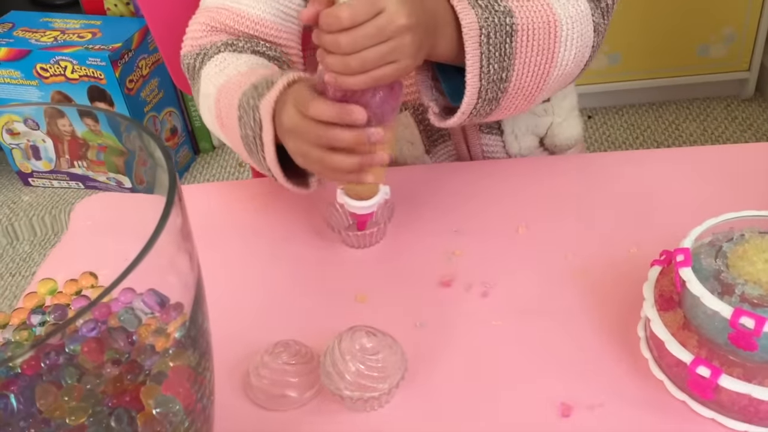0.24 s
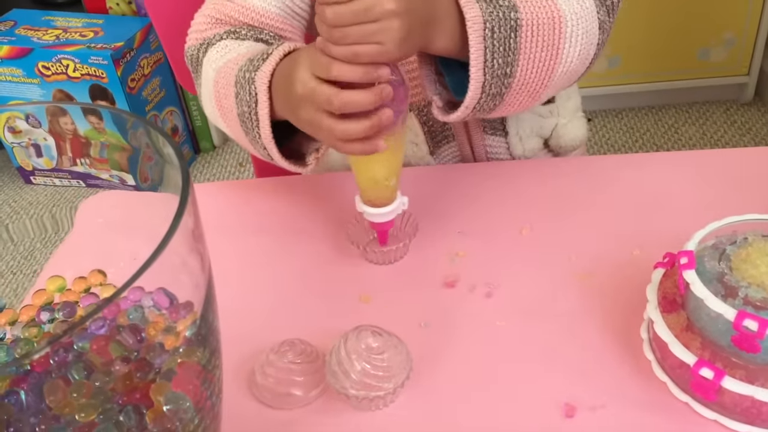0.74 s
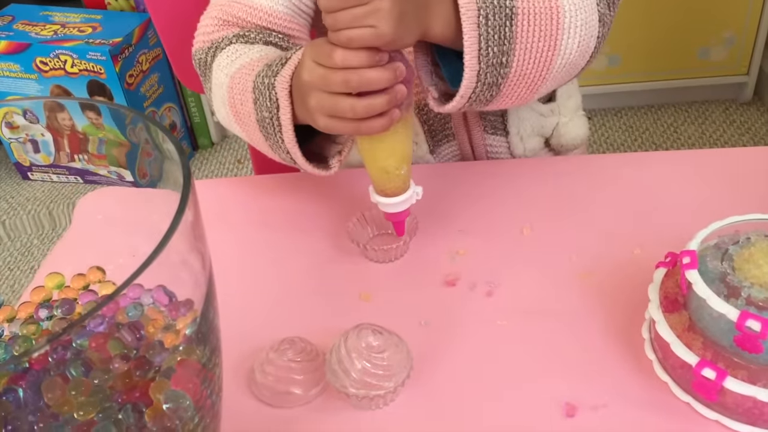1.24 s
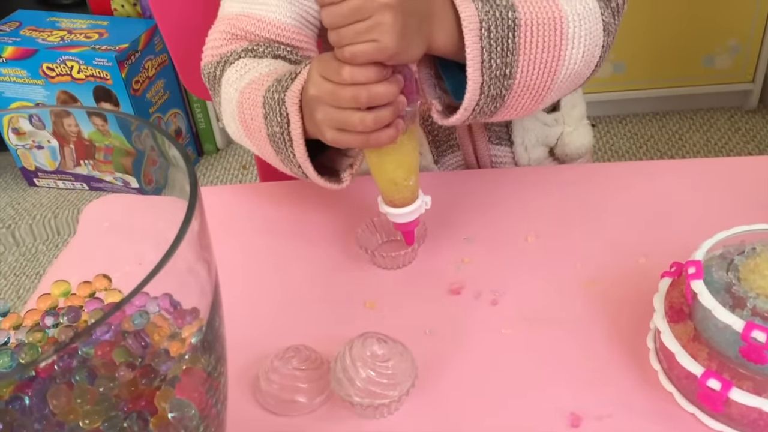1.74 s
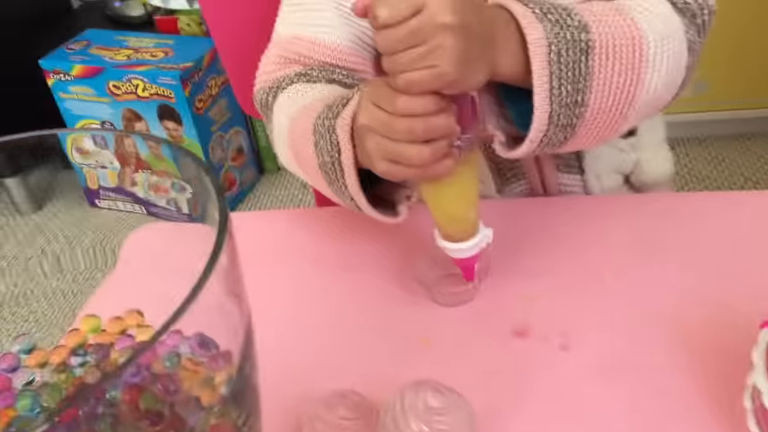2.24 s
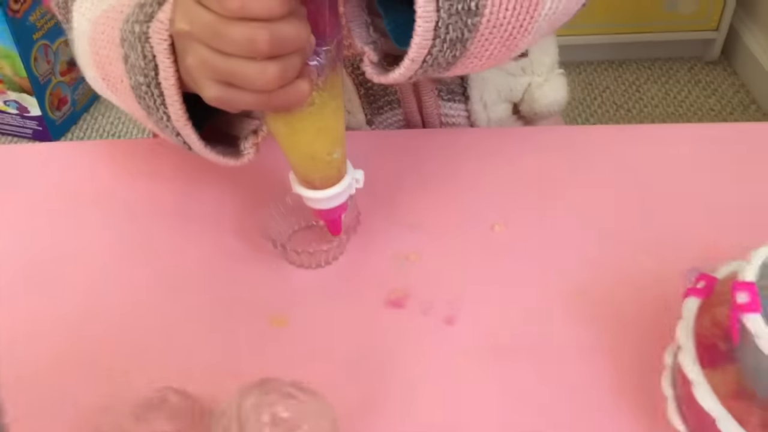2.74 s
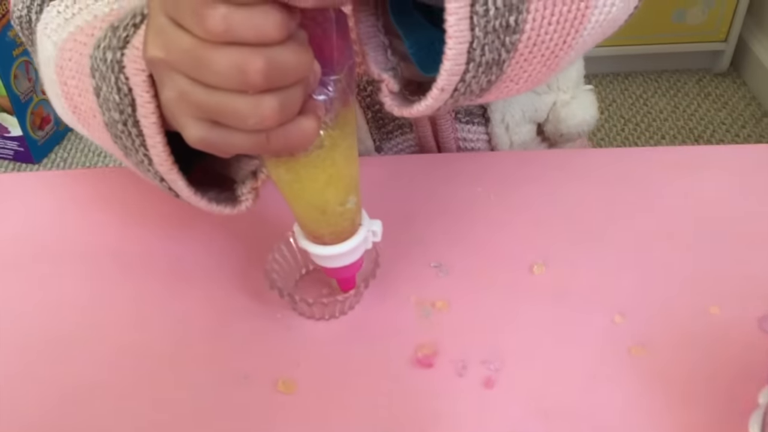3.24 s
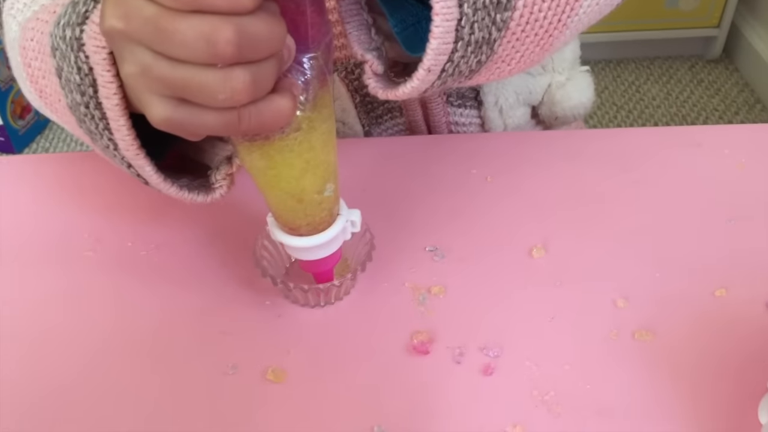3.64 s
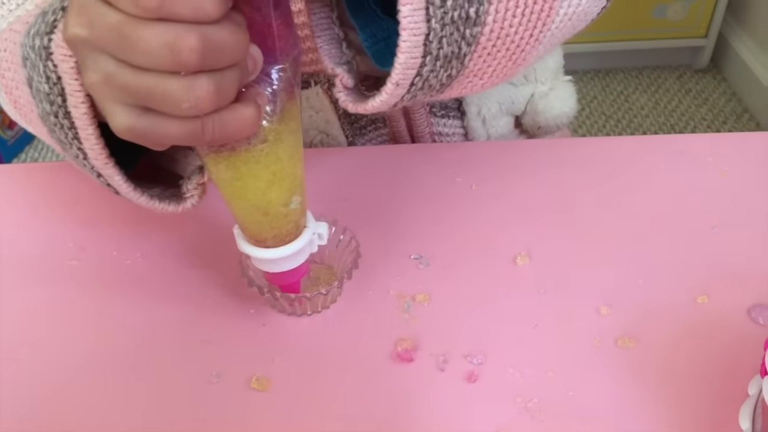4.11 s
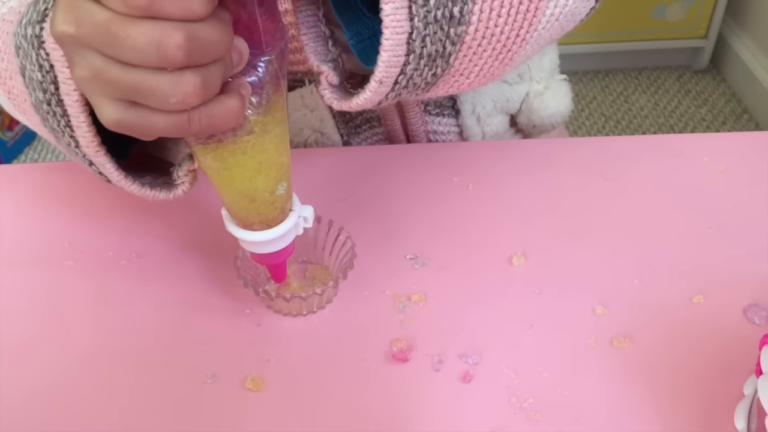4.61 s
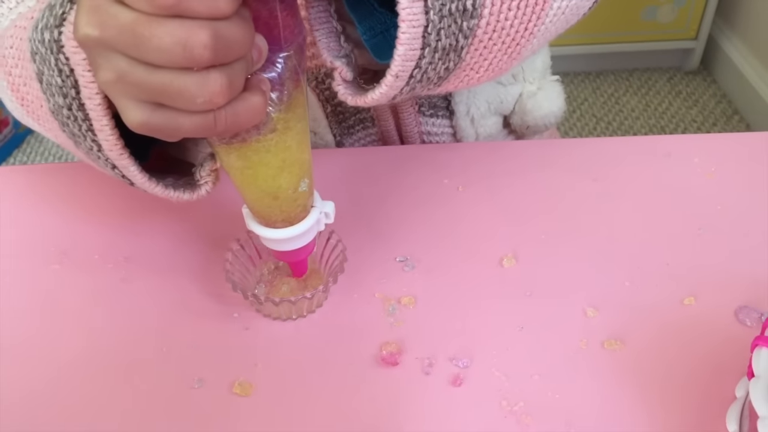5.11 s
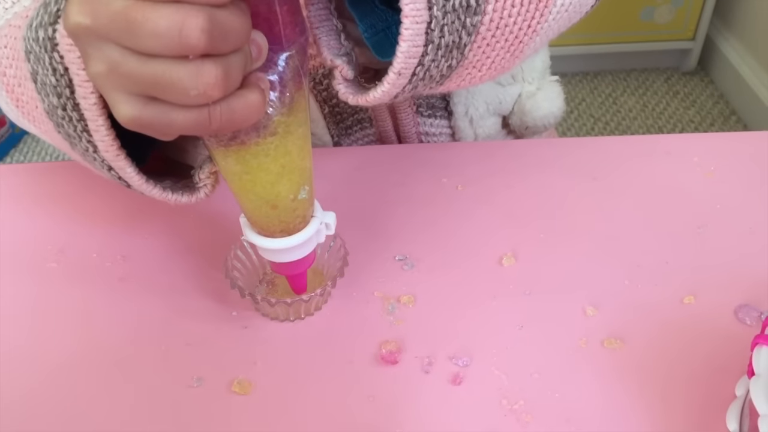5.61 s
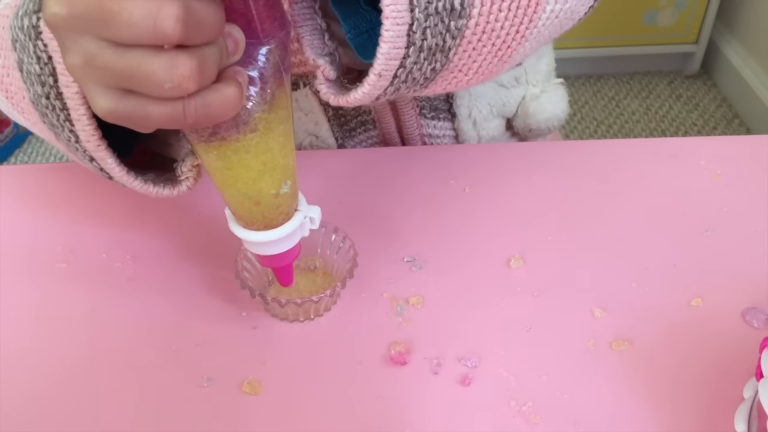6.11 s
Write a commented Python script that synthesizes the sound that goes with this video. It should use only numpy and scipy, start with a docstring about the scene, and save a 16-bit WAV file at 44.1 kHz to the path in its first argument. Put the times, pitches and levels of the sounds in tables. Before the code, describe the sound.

A quiet room with soft air noise and a low hum, heard close to a table through a camera microphone, with a short room tail. At about 0.3 s a faint wet squeeze crackles. From 0.4 to 0.7 s a nozzle makes short bright ticks on a thin plastic mould, with a firm, loud table knock and low thud at 0.5 s. At 0.75 s trapped air spits in a rapid flutter. A weak spurt and dull thud follow around 1.2 s, a single small pop at 1.8 s. From 2.0 to 2.7 s fingers rub and bump the camera, low and muffled, ending in a clearer bump. From 2.9 s beads squeeze through in tiny crisp wet pops and crackle, busiest and sharpest around 4.4 s. After 5.3 s the crackle becomes thicker, duller and more gurgling, continuing to the end at 6.3 s as the hum rises slightly.

```python
"""Close by a table in a quiet room: an icing bag of soft water beads is squeezed into a small plastic mould.
After a first faint squeeze the nozzle ticks on the mould, which knocks on the table: ringing modes and grit.
Trapped air spits out by ringing the nozzle's air; then fingers rub and bump the camera as it is moved closer.
Last the beads burst through the nozzle: pops of shaped noise with a cavity ring, over a crackle of noise grains.
Room air and a low hum, both coloured noise, run underneath, and the walls answer with a short tail."""
import sys
import numpy as np
from scipy import signal
from scipy.fft import rfft, irfft, next_fast_len
from scipy.io import wavfile

SR = 44100
rng = np.random.default_rng(int(sys.argv[2]) if len(sys.argv) > 2 else 0)


def log_audio(samples):
    """Write samples as a 16-bit WAV file to the path given in sys.argv[1]."""
    # one column per channel
    frames = np.atleast_2d(samples).T
    # limit to full scale, then quantise
    limited = np.clip(frames, -1, 1)
    pcm = np.round(limited * 32767).astype(np.int16)
    wavfile.write(sys.argv[1], SR, pcm)


N = 280476

# The air cavity of the nozzle. Each row: frequency in Hz, relative level in dB per Hz.
CAVITY_COLOUR = [(700, -45), (1400, -20), (1900, -11), (2350, -6), (2750, 2), (3050, 0), (3400, -10),
                 (4000, -11), (4700, -26), (8000, -60)]


def pops(spray_db=-24, spray_t60=0.12, snap_gain_db=1, ring_gain_db=0.5):
    """A bursting bead snaps, sprays briefly and rings the air in the nozzle."""
    # Colour of the wet film and nozzle. Each row: frequency in Hz, relative level in dB.
    film_colour = [(2150, -37), (4150, 13), (4800, -6), (5550, 11), (7050, 4), (7950, -1), (9250, 6),
                   (10600, -1.5), (12600, 0.5), (15300, 4)]
    track, t = np.zeros(N), np.arange(SR // 25) / SR
    snap_t60, cavity_t60, rise_s, octaves = 0.008, 0.016, 0.0003, 0.47
    to_5_ms = np.sqrt(0.005 / t[-1])  # from rms over the whole pop to rms over 5 ms
    for s, db, pitch_hz, ring_db in bead_runs():
        snap_noise, ring_noise = rng.standard_normal((2, len(t))) * (1 - np.exp(-t / rise_s))
        burst = snap_noise * (amp(-60 * t / snap_t60) + amp(spray_db - 60 * t / spray_t60))
        # the smaller the rupture, the higher its band
        band = filtered(burst, lambda hz: np.exp(-0.5 * (np.log2((hz + 1) / pitch_hz) / octaves) ** 2))
        snap = coloured(band, film_colour)
        ring = coloured(ring_noise * amp(-60 * t / cavity_t60), CAVITY_COLOUR)
        pop = amp(snap_gain_db) * snap + amp(ring_db + ring_gain_db) * ring
        add(track, s, to_5_ms * amp(db) * pop)
    return track


def bead_runs(gap_s=0.0052, loss_db=0.5):
    """Beads burst singly or in quick runs, where each sets off the next, a little weaker."""
    # Popping beads and wet film. Each row: start in seconds, relative level in dB, pitch in Hz,
    # relative ring of the nozzle cavity in dB, number of beads in the run.
    beads_popping = [(0.257, -56.5, 5500, -18, 2), (0.2992, -52.5, 5470, -6.5, 1),
                     (1.2038, -63.5, 5800, -1.5, 1), (1.7872, -46.5, 6260, -4.5, 1),
                     (2.8653, -53.5, 11600, -5.5, 1), (2.9192, -59.5, 9600, -7, 1),
                     (3.3442, -50.5, 13700, -23, 3), (3.5624, -57, 8000, -3, 1),
                     (3.683, -53.5, 8800, -6.5, 1), (3.7829, -51, 9100, -3.5, 2),
                     (3.9557, -49, 6600, -10.5, 1), (4.072, -50.5, 9800, -16, 1),
                     (4.1481, -51.5, 7200, -6, 2), (4.1775, -55.5, 8600, -23, 1),
                     (4.2322, -52.5, 11600, -10, 1), (4.4002, -44.5, 11300, -12, 1),
                     (4.4343, -45, 12800, -9.5, 1), (4.444, -55, 10800, -1, 2),
                     (4.4532, -42.5, 12800, -14.5, 3), (4.5771, -56.5, 10100, -14, 1),
                     (4.7654, -44.5, 10700, -21, 1), (4.8, -56, 11500, -7, 1), (4.8186, -53, 9200, -17, 1),
                     (4.8616, -59, 12000, -19, 1), (4.8985, -55, 9600, -23, 1),
                     (5.1183, -50, 12100, -31, 3), (5.205, -56, 10100, -9, 1), (5.249, -49, 8100, -7, 1),
                     (5.279, -50, 8900, -26, 2), (5.3345, -44, 10000, -29, 1), (5.423, -49, 7600, -6.5, 1),
                     (5.5548, -53, 6130, -1, 1), (5.8788, -52.5, 7900, 7.5, 1),
                     (5.9475, -53, 10100, -2.5, 2), (6.1763, -65.5, 8000, 9.5, 1),
                     (6.232, -57.5, 9300, 1.5, 1), (6.3453, -59, 8900, -2, 2)]
    return [(s + k * gap_s, db - k * loss_db, pitch_hz, ring_db)
            for s, db, pitch_hz, ring_db, beads in beads_popping
            for k in range(round(beads))]


def crackle(level_db=-2, gurgle_db=-12, fizz_db=-3, open_treble_db=9, buried_treble_db=4, buried_gurgle_db=3):
    """Wet ticks in three bands over a denser fizz, and small gurgles in the nozzle, as loud as the squeeze."""
    # Bands of large, middling and small droplets. Each row: lower edge in Hz, upper edge in Hz.
    droplet_bands = [(1000, 7500), (7500, 11500), (11500, 17000)]
    # Colour of the wet crackle. Each row: frequency in Hz, relative level in dB per Hz.
    wet_colour = [(1100, -8), (2050, -4), (2700, 0.5), (3500, -13.5), (4700, -12.5), (5700, 2.5),
                  (7700, -3.5), (9100, 3), (11200, -4.5), (14000, -10), (16000, -6)]
    # The hand tightens and beads slip through. Each row: hardest moment in seconds,
    # relative crackle level in dB, length in seconds.
    squeezes = [(.27, -61.5, 0.1), (2.87, -67, 0.11), (3.06, -65, 0.28), (3.36, -61.5, 0.048),
                (3.49, -57.5, 0.081), (3.79, -62, 0.14), (3.89, -56.5, 0.074), (4.26, -57, .12),
                (4.38, -58.5, 0.053), (4.455, -56, 0.055), (4.65, -79, 0.059), (4.8, -64, 0.11),
                (5.28, -58.5, 0.13), (5.56, -55, 0.17), (5.67, -54, 0.058), (6.22, -53.5, 0.073)]
    # The slower grip on the bag. Each row: time in seconds, relative crackle level in dB.
    grip = [(0, -71), (1.5, -92), (2.9, -68), (3.3, -73), (4.9, -65), (5.1, -67.5), (5.45, -61),
            (6.36, -59)]
    # the rising heap covers the tip: the crackle dulls and gurgles more
    buried_at_s, burying_s = 5.3, 0.2
    buried = 0.5 + 0.5 * np.tanh((np.arange(N) / SR - buried_at_s) / burying_s)
    large, middling, small = [
        filtered(grains(per_second=85, size_db=3.4, life_t60=0.006), lambda hz: (hz > lo) & (hz < hi))
        for lo, hi in droplet_bands]
    small = small * amp(open_treble_db * (1 - buried) + buried_treble_db * buried)
    fizz = grains(per_second=300, size_db=2.2, life_t60=0.006)
    gurgles = coloured(grains(per_second=70, size_db=2.2, life_t60=0.014), CAVITY_COLOUR)
    wet = coloured(large + middling + small + amp(fizz_db) * fizz, wet_colour)
    wet = wet + amp(gurgle_db + buried_gurgle_db * buried) * gurgles
    effort = np.hypot(amp(curve(grip)), swells(squeezes))
    return amp(level_db) * effort * wet


def mould_ticks():
    """The nozzle touches the thin mould, whose short bright modes ring."""
    # Touches. Each row: start in seconds, peak level in dB, contact brightness in Hz.
    touches = [(.4166, -22.5, 13900), (.4722, -25, 12200), (.5328, -28, 15000), (.5647, -28, 15000),
               (.677, -33.5, 4450), (.811, -42.5, 12000)]
    # The thin mould. Each row: mode in Hz, relative level in dB, t60 in seconds.
    mould_modes = [(615, -21, 0.014), (1060, -0.5, 0.01), (1420, 2, 0.018), (2150, 12.5, 0.0034),
                   (3140, 4, 0.0085), (3540, -3, 0.0073), (7010, -1, 0.014), (9100, 2, 0.013),
                   (10230, 2.5, 0.009), (11600, -8, 0.0095), (12600, -9, .006), (14900, -9, 0.0069)]
    return blows(touches, mould_modes, grit_db=-7.0, grit_t60=0.022)


def table_knocks():
    """The mould is pushed onto the table, whose top rings; the weight of the bag follows."""
    # Knocks. Each row: start in seconds, peak level in dB, contact brightness in Hz.
    pushes = [(.4285, -42, 450), (.4969, -15.5, 5450), (.5012, -31.5, 800), (.5046, -19, 997),
              (.5108, -23, 270), (.5285, -45, 329), (.5625, -37, 168)]
    # The table top. Each row: mode in Hz, relative level in dB, t60 in seconds.
    table_modes = [(84.5, -12.5, 0.042), (154, -7.5, 0.043), (182, -7, 0.038), (282, -24, 0.022),
                   (302, -7.5, 0.069), (371, -9.5, 0.054), (552, -9.5, 0.028), (650, -4.5, 0.014),
                   (808, -6.5, 0.047), (978, -3, 0.025), (1305, 2, 0.015), (1536, 0.5, 0.011),
                   (1730, -8.5, 0.048), (2354, 1.5, 0.011), (2820, -4.5, 0.018), (3340, -7, 0.0078),
                   (6100, -15.5, 0.0065)]
    return blows(pushes, table_modes, grit_db=2.5, grit_t60=0.016)


def thumps():
    """Soft low pushes of a few cycles that glide in pitch."""
    # Dull thuds, the first from the weight of the bag. Each row: start in seconds,
    # envelope peak in dB, start pitch in Hz, end pitch in Hz, swell in seconds.
    thuds = [(0.5097, -15, 115, 238, 0.002), (1.269, -39.5, 154, 49.7, 0.012)]
    track, t = np.zeros(N), np.arange(SR // 10) / SR
    for s, db, start_hz, end_hz, swell in thuds:
        hz = end_hz + (start_hz - end_hz) * np.exp(-t / swell)
        envelope = (t / swell * np.exp(1 - t / swell)) ** 3
        add(track, s, amp(db) * envelope * np.sin(2 * np.pi * np.cumsum(hz) / SR))
    return track


def air_spurts():
    """Trapped air spits out in quick spurts and rings the air in the nozzle."""
    # The air in the nozzle. Each row: mode in Hz, relative level in dB, t60 in seconds.
    nozzle_modes = [(487, -34, 0.028), (1270, -7.5, 0.011), (1507, -3.5, 0.018), (1700, 0, 0.018),
                    (1940, -1.5, 0.013), (2166, -8, 0.015), (3350, -5.5, 0.0078), (4010, -11, 0.022),
                    (5430, -1.5, 0.0057), (8600, -12, 0.0063), (11900, -3.5, 0.0084)]
    return blows(flutter(), nozzle_modes, grit_db=-18, grit_t60=0.029)


def flutter(flap_s=0.0048, loss_db=0.5):
    """Each spurt flaps the wet nozzle one or more times, ever weaker."""
    # Spurts of air. Each row: start in seconds, peak level of the first flap in dB, brightness in Hz, flaps.
    spurts = [(0.75, -17.5, 6960, 1), (0.755, -19.5, 2600, 1), (0.7615, -31.5, 3540, 4),
              (1.1478, -44, 1630, 1)]
    return [(s + k * flap_s, db - k * loss_db, bright_hz)
            for s, db, bright_hz, flaps in spurts
            for k in range(round(flaps))]


def handling(rub_db=-2):
    """The hand rubs the camera body in small slips and bumps it, right at the microphone."""
    # The hand shifts its hold. Each row: hardest moment in seconds, relative rumble level in dB,
    # length in seconds.
    shifts = [(2.06, -53, 0.13), (2.22, -54.5, 0.32), (2.62, -53, 0.25), (3.55, -65, 0.42)]
    # Colour of the rub. Each row: frequency in Hz, relative level in dB per Hz.
    rumble_colour = [(25, -19), (60, 10), (130, -3.5), (300, -9), (500, -19), (1300, -21), (2200, -23.5),
                     (5000, -31.5)]
    # Fingers bump the camera as it moves. Each row: start in seconds, peak level in dB,
    # contact brightness in Hz.
    finger_bumps = [(2.027, -45.5, 90), (2.1805, -42.5, 279), (2.2565, -49.5, 317), (2.386, -50, 95),
                    (2.5625, -39, 220), (2.6043, -34, 970), (2.6732, -43, 2500), (2.6788, -29, 3340),
                    (2.6823, -38.5, 1070)]
    # The camera body. Each row: mode in Hz, relative level in dB, t60 in seconds.
    camera_modes = [(60, -13, 0.062), (118, -5, 0.024), (202, -7.5, 0.031), (700, -9, 0.031),
                    (1040, -13, 0.016), (1228, -7, 0.05), (2070, -12, 0.03), (2840, -15, 0.013),
                    (3140, -17, 0.048), (3500, -14.5, 0.037)]
    slips = grains(per_second=90, size_db=0.5, life_t60=0.089)
    rub = amp(rub_db) * swells(shifts) * coloured(slips, rumble_colour)
    return rub + blows(finger_bumps, camera_modes, grit_db=-7, grit_t60=0.042, scatter_db=-0.5, detune=0.0066)


def background(air_db=-66.0):
    """Steady room air, with a low hum that dips slightly, then grows as the camera nears the table."""
    # The quiet room. Each row: frequency in Hz, relative level in dB per Hz.
    air_colour = [(15, -56), (25, 3), (36, -0.5), (64, 4), (189, -7.5), (291, -9.5), (316, -22), (361, -16),
                  (449, -24), (500, -12.5), (637, -11), (2890, -13), (3390, -14), (13100, -29),
                  (15800, -35.5)]
    # Low hum of the room near the table. Each row: frequency in Hz, relative level in dB per Hz.
    hum_colour = [(60, -9), (130, 0.5), (220, -1.5), (300, -2.5), (420, -7.5), (700, -16.5), (1500, -48),
                  (4000, -20.5)]
    # Loudness of the hum. Each row: time in seconds, rms level in dB.
    hum_level = [(2.5, -66.5), (3.3, -67.5), (4.7, -64.5), (6.36, -63)]
    air = amp(air_db) * coloured(rng.standard_normal(N), air_colour)
    hum = amp(curve(hum_level)) * coloured(rng.standard_normal(N), hum_colour)
    return air + hum


def room(x, build_s=0.0031):
    """The walls answer with a short noise tail; its highest treble dies first."""
    # Decay of the room. Each row: frequency in Hz, t60 in seconds.
    room_t60 = [(150, 0.3), (600, 0.28), (2000, 0.37), (6000, 0.22), (14000, 0.055)]
    # Colour of the tail. Each row: frequency in Hz, relative level in dB.
    tail_colour = [(100, -5.5), (500, -1), (1500, -4), (3000, -3), (6000, 0), (14000, 1)]
    hz, t, bins = signal.stft(rng.standard_normal(SR // 2), SR, nperseg=256)
    decay = amp(-60 * t / along(room_t60, hz)[:, None])
    tail = signal.istft(bins * decay, SR, nperseg=256)[1]
    tail = tail * (1 - np.exp(-(np.arange(len(tail)) / SR / build_s) ** 2))
    tail = filtered(tail / np.linalg.norm(tail), lambda f: amp(along(tail_colour, f)))
    return signal.fftconvolve(x, tail)[:N]


def blows(rows, modes, grit_db, grit_t60, scatter_db=1.2, detune=0.014):
    """Each blow rings slightly varied modes with a short gritty crack; a soft contact loses the treble."""
    track, t = np.zeros(N), np.arange(SR // 6) / SR
    hz, level, t60 = np.transpose(modes)[:, :, None]
    polarity = (-1) ** np.arange(len(modes))[:, None]
    for s, db, bright_hz in rows:
        gain, shift = rng.standard_normal((2, *hz.shape))
        decay = amp(level + scatter_db * gain - 60 * t / t60)
        ring = np.sum(polarity * decay * np.sin(2 * np.pi * hz * (1 + detune * shift) * t), axis=0)
        crack = amp(grit_db - 60 * t / grit_t60) * rng.standard_normal(len(t))
        softness = signal.butter(2, min(bright_hz, SR / 2 - 1), fs=SR, output="sos")
        sound = signal.sosfilt(softness, ring + crack)
        add(track, s, amp(db) * sound / np.abs(sound).max())
    return track


def grains(per_second, size_db, life_t60):
    """Short noise bursts at random moments, most of them small, at rms 1."""
    sizes = amp(size_db * np.minimum(rng.exponential(size=N), 4))
    sizes = sizes * (rng.random(N) < per_second / SR)
    t = np.arange(SR // 50) / SR
    power = np.abs(signal.fftconvolve(sizes ** 2, amp(-60 * t / life_t60) ** 2)[:N])
    return unit(np.sqrt(power) * rng.standard_normal(N))


def swells(rows, rise_share=0.41, range_db=10):
    """Gain per sample of (s, dB, length) efforts that each build up and let go."""
    # rise_share: part of the length spent tightening; range_db: fall from the hardest moment to either end
    gain = np.zeros(N)
    for s, db, length in rows:
        phase = (np.arange(N) / SR - s) / length
        away = np.maximum(-phase / rise_share, phase / (1 - rise_share))
        gain += amp(db - range_db * np.minimum(away, 10))
    return gain


def amp(db):
    """Amplitude of a level in dB."""
    return 10 ** (np.asarray(db) / 20)


def unit(x):
    """x scaled to rms 1."""
    return x / np.sqrt(np.mean(x ** 2) + 1e-20)


def along(points, hz):
    """(Hz, value) points read at hz on a log axis."""
    f, v = np.transpose(points)
    return np.interp(np.log(hz + 1), np.log(f + 1), v)


def curve(rows):
    """One value per sample from (s, value) rows."""
    return np.interp(np.arange(N) / SR, *np.transpose(rows))


def filtered(x, response):
    """x times a response of frequency."""
    m = next_fast_len(len(x) + 2 ** 12)
    return irfft(rfft(x, m) * response(np.fft.rfftfreq(m, 1 / SR)), m)[:len(x)]


def coloured(x, spectrum):
    """x shaped by (Hz, dB) points, at rms 1."""
    return unit(filtered(x, lambda hz: amp(along(spectrum, hz))))


def add(track, s, sound):
    """Mix a sound into the track at time s."""
    part = track[max(round(s * SR), 0):][:len(sound)]
    part += sound[:len(part)]


def scene():
    """Bag, mould and table with their echo, then the handled camera and the room."""
    squish = pops() + crackle()
    tick = mould_ticks()
    knock = table_knocks() + thumps()
    spurt = air_spurts()
    # each source sends its own share to the walls
    small_sounds = amp(-12) * tick + amp(-15.5) * spurt + amp(-15) * squish
    echo = room(small_sounds + amp(-10.5) * knock)
    return (tick + knock + spurt + squish + echo + handling() + background())[None]


def record(dry, low_cut_hz=42, top_hz=16050):
    """The camera's microphone drops the deepest bass and keeps nothing above its band limit."""
    low_cut = signal.butter(3, low_cut_hz, "highpass", fs=SR, output="sos")
    thin = signal.sosfilt(low_cut, dry)
    return np.array([filtered(channel, lambda hz: hz < top_hz) for channel in thin])


dry = scene()
out = record(dry)
log_audio(out)
```